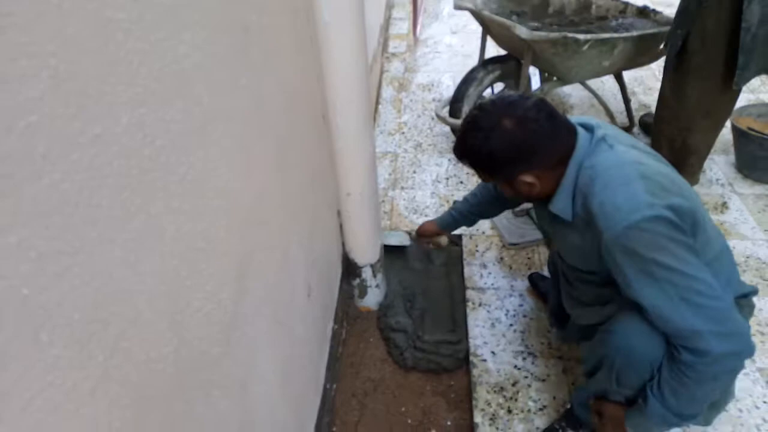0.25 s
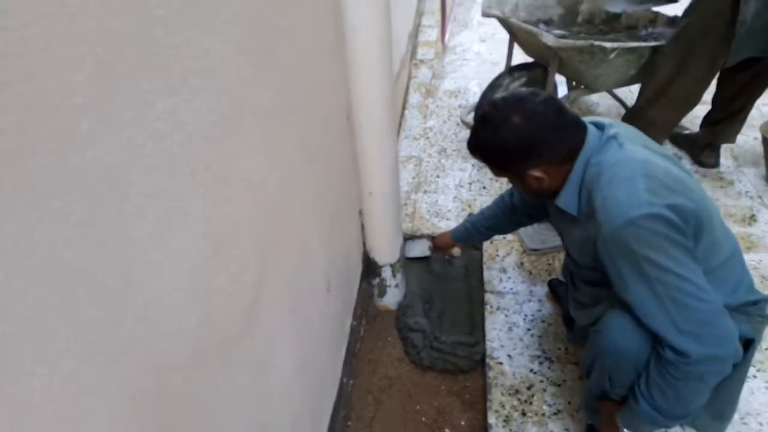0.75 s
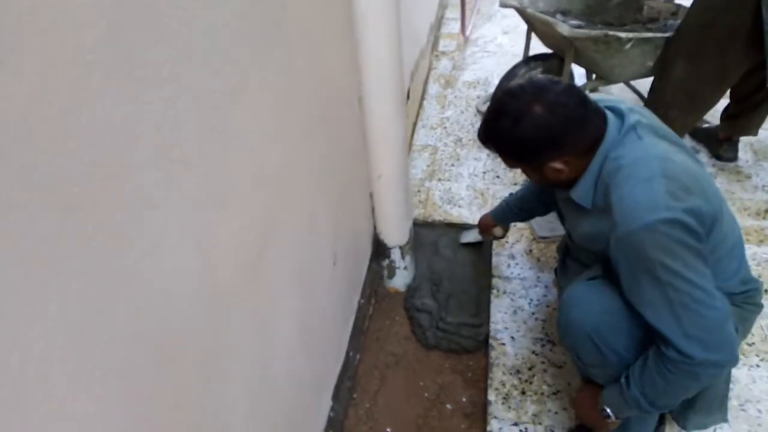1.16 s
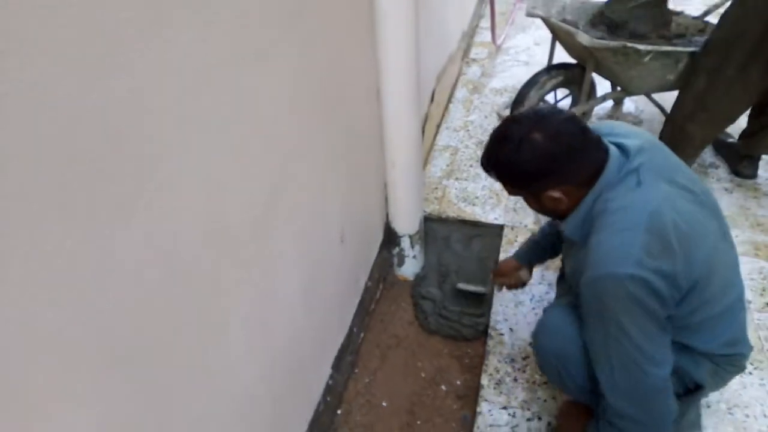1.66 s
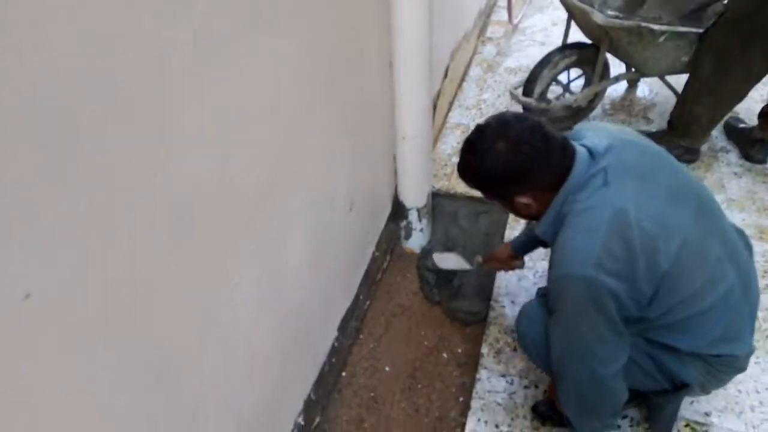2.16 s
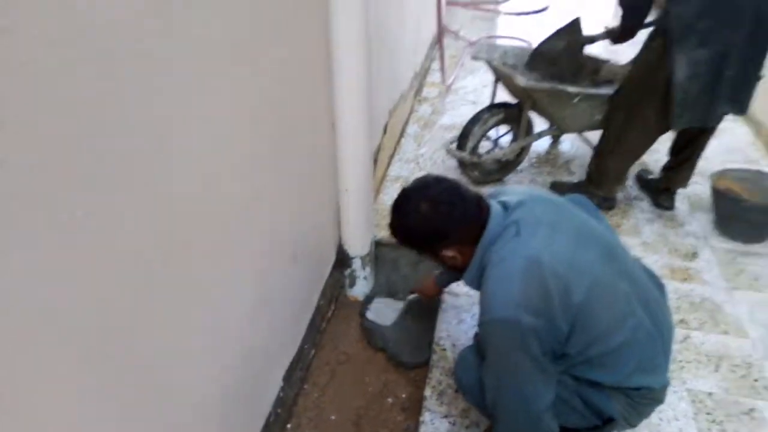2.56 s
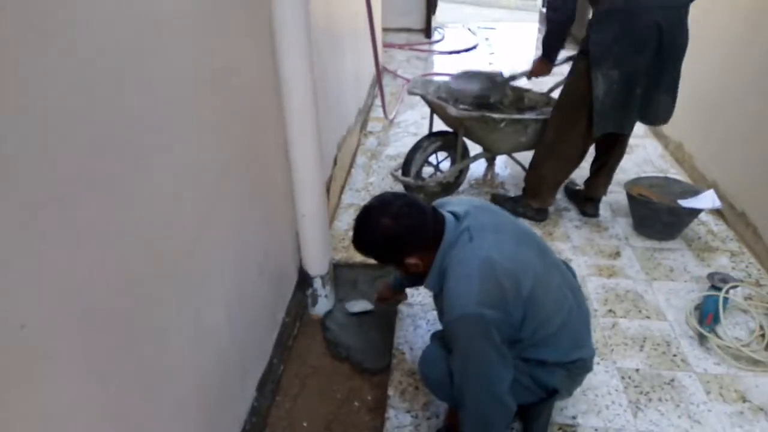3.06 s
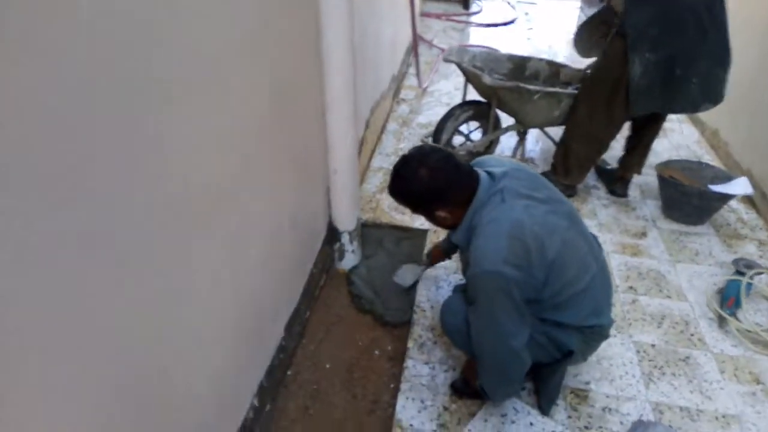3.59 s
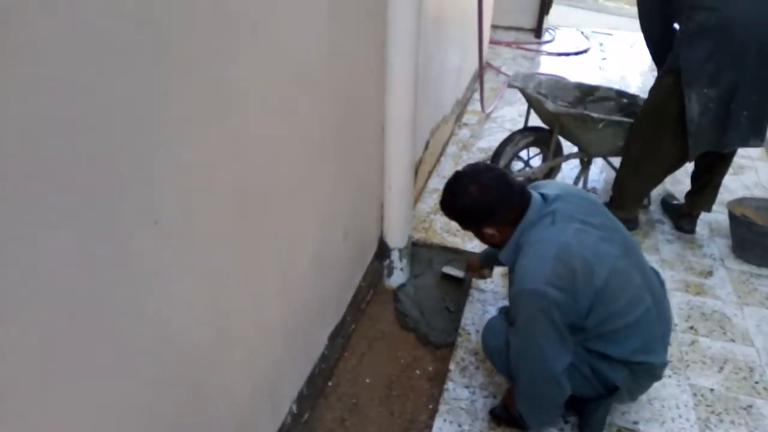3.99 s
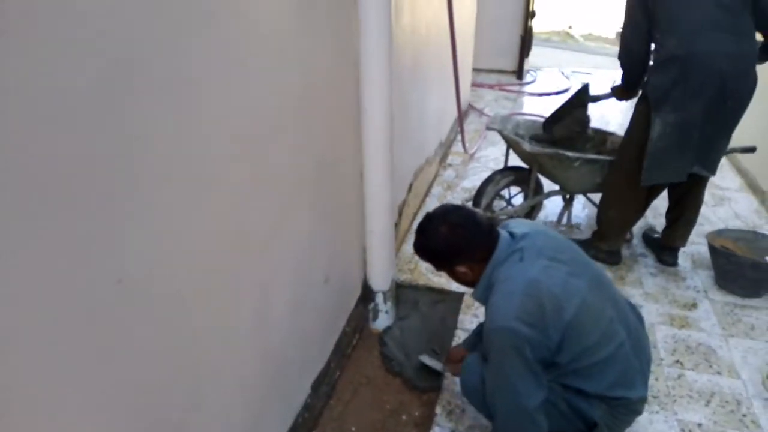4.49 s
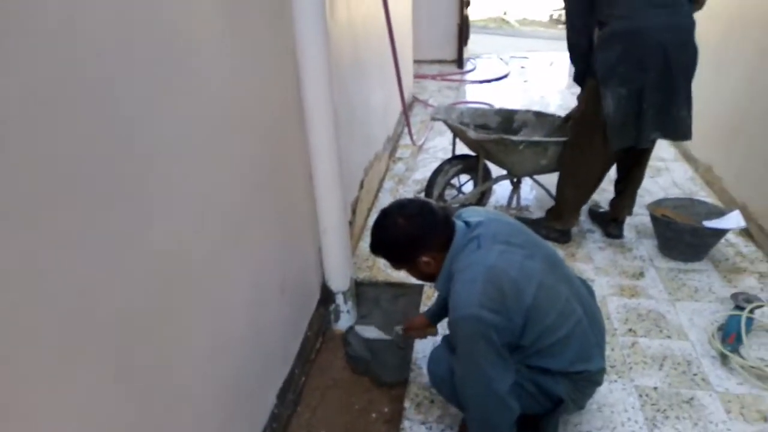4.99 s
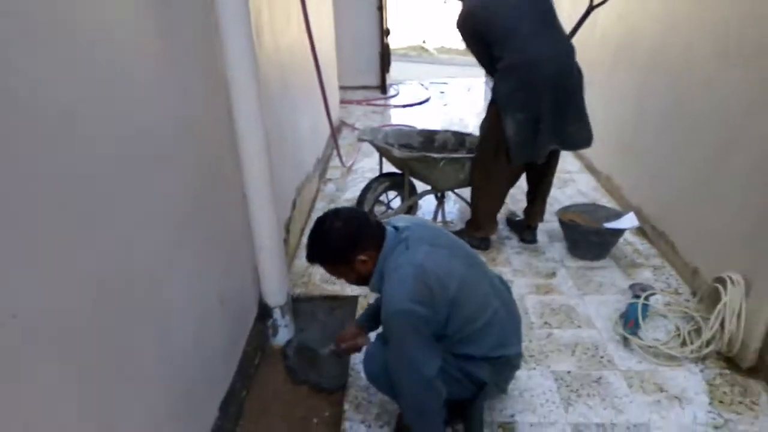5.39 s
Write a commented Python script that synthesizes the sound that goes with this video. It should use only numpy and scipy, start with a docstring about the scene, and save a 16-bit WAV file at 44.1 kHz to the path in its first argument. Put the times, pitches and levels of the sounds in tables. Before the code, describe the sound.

In a paved passage between two walls, a trowel spreads wet mortar with gritty hisses, crunches and soft popping slaps. Early on a shovel judders and squeals along a steel wheelbarrow with a hollow boom; later it digs into the sandy mix. Sharp clicks and faint blade rings fall between. Quiet outdoor air, short echoes, a small microphone with dulled treble.

```python
"""Sand hisses and crunches under a steel trowel that spreads and slaps wet mortar in a paved passage.
Strokes are streams of grain clicks; slaps add a splat, an air-pocket pop and a soft thud of noise.
A shovel judders along a steel wheelbarrow: a wavering tone squeals, resonances rasp and boom.
Later it digs into the sandy mix. Small bumps, clicks and blade rings fall between, over quiet outdoor
air; two walls add echoes and a short tail, and a small microphone dulls the treble."""
import sys
import numpy as np
from scipy import signal
from scipy.fft import rfft, irfft
from scipy.io import wavfile
from scipy.ndimage import uniform_filter1d

SR = 44100
rng = np.random.default_rng(int(sys.argv[2]) if len(sys.argv) > 2 else 0)


def int16_out(signal):
    """Quantize to a 16-bit WAV file."""
    q = np.round(np.clip(np.atleast_2d(signal).T, -1, 1) * 32767)
    wavfile.write(sys.argv[1], SR, q.astype(np.int16))


N = 248724
TIME = np.arange(N) / SR
HZ = np.fft.rfftfreq(N, 1 / SR)
# All table levels are relative: layer gains, echoes and the microphone follow.


def amp(db):
    """Decibels to gain."""
    return 10 ** (np.asarray(db) / 20)


def unit(x):
    """Scales to rms 1."""
    return x / np.sqrt(np.mean(x ** 2) + 1e-20)


def steady(x, length_s):
    """Evens the level to rms 1 over stretches of the given length."""
    power = uniform_filter1d(x ** 2, max(int(length_s * SR), 3))
    return x / np.sqrt(abs(power) + 1e-12)


def read(points, hz):
    """Reads a table on a log-frequency axis."""
    f, value = np.transpose(points)
    return np.interp(np.log(hz + 1), np.log(f + 1), value)


def colour(x, points):
    """Causal minimum-phase filter with the given spectrum."""
    log_gain = np.log(amp(read(points, abs(np.fft.fftfreq(N, 1 / SR)))))
    # the Hilbert transform of the log gain gives the phase
    response = np.exp(np.conj(signal.hilbert(log_gain)))
    taps = irfft(response[:len(HZ)], N)[:4096]
    return signal.oaconvolve(x, taps)[:N]


def ring(x, modes):
    """Passes x through parallel resonances of alternating sign."""
    body = 0
    for k, (f, width, db) in enumerate(modes):
        detuning = (HZ ** 2 - f ** 2) / (width * HZ + 1e-9)
        body = body + (-1) ** k * amp(db) / (1 + 1j * detuning)
    return irfft(rfft(x) * body, N)


def wander(hz):
    """Random drift of rms 1, up to about the given rate."""
    return unit(irfft(rfft(rng.standard_normal(N)) / (1 + (HZ / hz) ** 4), N))


def scrape(x, modes, flare_db, flare_hz):
    """The point of contact moves, so each mode flares and fades on its own."""
    out = np.zeros(N)
    for k, mode in enumerate(modes):
        out += (-1) ** k * ring(x, [mode]) * amp(flare_db * wander(flare_hz))
    return out


def level(s, db):
    """Gain along a curve, fading within milliseconds outside it."""
    outside_s = np.maximum(np.maximum(s[0] - TIME, TIME - s[-1]), 0)
    return amp(np.interp(TIME, s, db)) * np.exp(-(outside_s / 0.0081) ** 2)


def swell(start, rise, fall, swell_db, fade_db):
    """One push of a tool: friction grows as it bears down and fades as it eases off."""
    return level([start, start + rise, start + rise + fall], [-swell_db, 0, -fade_db])


def add(mix, s, sound):
    """Mixes a sound in at time s."""
    part = mix[round(s * SR):][:len(sound)]
    part += sound[:len(part)]


def grains(per_s, spread_db, clump_db):
    """Clicks of sand grains of uneven size that break loose in clumps."""
    size = amp(spread_db * np.minimum(rng.exponential(1, N), 5))
    sign = rng.choice([-1, 1], N)
    hits = rng.random(N) < per_s / SR
    return unit(size * sign * hits * amp(clump_db * wander(63)))


def burst(t, rise_s, decay_s):
    """Envelope of a blow."""
    return (1 - np.exp(-t / rise_s)) * np.exp(-t / decay_s)


def band_noise(t, hz, ratio):
    """A short stretch of noise around hz, with a fairly even level."""
    edges_hz = [hz / (1 + ratio), min(hz * (1 + ratio), SR / 2.2)]
    sos = signal.butter(3, edges_hz, "band", fs=SR, output="sos")
    # the first half lets the filter settle
    x = signal.sosfilt(sos, rng.standard_normal(2 * len(t)))
    return steady(x, 3 / hz)[-len(t):]


def knocks(rows, rise_s, ratio):
    """Damped contacts: each a decaying noise band of its own pitch."""
    t, out = TIME[:SR // 3], np.zeros(N)
    for s, db, hz, decay_s in rows:
        add(out, s, amp(db + 2.0) * burst(t, rise_s, decay_s) * band_noise(t, hz, ratio))
    return out


def outdoor_air():
    """Steady noise shaped to the outdoor background."""
    # Background spectrum. Each row: frequency in Hz, level in dB.
    air_spectrum = [(25, -17), (60, -6.5), (105, 11.5), (170, -0.5), (300, -2.5), (480, -11), (900, -7.5),
                    (1800, -0.5), (3600, -10), (6200, -1.5), (9000, -28), (16000, -35)]
    return amp(-62.5) * unit(colour(rng.standard_normal(N), air_spectrum))


def dull_bumps():
    """The barrow, shifting feet and falling mortar bump with slow onsets."""
    # Each row: start in seconds, level in dB, pitch in Hz, decay in seconds.
    bump_rows = [(.332, -39, 187, 0.024), (.431, -22.5, 714, .008), (.431, -27.5, 175, 0.017),
                 (.532, -25, 174, 0.012), (2.514, -44, 404, 0.012), (2.607, -46, 248, 0.023),
                 (2.615, -47.5, 98, .023), (3.667, -46, 446, 0.02), (3.675, -46, 134, 0.045),
                 (3.96, -37, 224, 0.014), (4.54, -61, 134, 0.17), (4.98, -53, 313, 0.05)]
    return knocks(bump_rows, rise_s=0.005, ratio=0.37)


def barrow():
    """Steel sticks and slips on steel: the shovel squeals, the tray rasps and booms."""
    # Pushes along the tray. Each row: start, bearing down and easing off in seconds,
    # squeal and boom levels in dB.
    pushes = [(.295, .025, .01, -52.5, -66), (0.333, 0.089, 0.16, -38, -36.5),
              (.735, 0.038, 0.026, -65.5, -51.5), (1.005, .035, 0.12, -37, -43.5),
              (1.4, 0.08, 0.123, -47.5, -43.5)]
    # Catches and slips. Each row: time in seconds, squeal and rasp levels in dB, length in seconds.
    slips = [(0.291, -47, -54, 0.0016), (0.327, -30.5, -66, 0.0015), (0.361, -37.5, -38.5, 0.0059),
             (0.405, -27.5, -34.5, 0.0043), (0.435, -24, -25.5, 0.0026), (0.439, -30, -35, 0.0032),
             (0.468, -20, -27, 0.0055), (0.517, -42, -33.5, 0.012), (0.535, -24, -34, 0.0045),
             (0.551, -44, -36, 0.017), (1.032, -25, -47, 0.0058), (1.061, -41, -25.5, 0.0033),
             (1.082, -25, -29.5, 0.0053), (1.449, -41, -39.5, 0.0037), (1.506, -38, -36.5, 0.0063),
             (1.633, -38, -55, 0.0036)]
    # Shovel and tray resonances. Each row: frequency in Hz, width in Hz, level in dB.
    steel_modes = [(283, 22, 3), (396, 98, 1), (839, 58, 3.5), (1306, 29, 5), (1548, 33, 5),
                   (2270, 210, 1.5), (3640, 26, 6), (3720, 33, 6.5), (4046, 45, 7.5), (4280, 59, 3.5),
                   (4784, 47, 5), (5470, 270, -10.5), (6205, 64, 2.5), (6690, 200, -4.5)]
    # Hollow of the barrow. Each row: frequency in Hz, width in Hz, level in dB.
    tray_modes = [(95.5, 1.8, 8.5), (155.2, 46, -11), (199, 42, -12)]
    # Grit crushed under the shovel. Each row: frequency in Hz, level in dB.
    rasp_spectrum = [(25, -58), (130, 16), (260, 1), (500, -11.5), (850, -2), (1100, -20), (1400, -9),
                     (3000, -9.5), (7000, -9), (16000, -18)]
    squeal_hz, squeal_wander_hz = 2245, 75
    judder_db, judder_hz = 2, 109
    boom_linger_s = 0.082

    drag, boom = np.zeros((2, N))
    for start, rise, fall, squeal_db, boom_db in pushes:
        drag += amp(squeal_db) * swell(start, rise, fall, swell_db=4.5, fade_db=20)
        boom += amp(boom_db) * swell(start, rise, fall + boom_linger_s, swell_db=7.5, fade_db=10.5)
    squeal = amp(3.0) * drag * amp(1.1 * wander(120))
    rasp = amp(5.5) * drag
    for s, squeal_db, rasp_db, length_s in slips:
        slip = np.exp(-((TIME - s) / length_s) ** 2 / 2)
        squeal += amp(squeal_db) * slip
        rasp += amp(rasp_db) * slip

    pitch_hz = squeal_hz + squeal_wander_hz * wander(382)
    tone = unit(np.sin(2 * np.pi * np.cumsum(pitch_hz) / SR))
    contacts = grains(per_s=4000, spread_db=5.0, clump_db=3.0)
    steel = unit(scrape(contacts, steel_modes, flare_db=1.0, flare_hz=24.4))
    grit = unit(colour(grains(per_s=3700, spread_db=2.0, clump_db=2.2), rasp_spectrum))
    # steel and grit pulse together; 1.07 dB offsets part of the judder's gain
    judder = amp(judder_db * wander(judder_hz) - 1.07)
    chatter = steady(steel + amp(-4.5) * grit, 0.019) * judder
    tray = ring(rng.standard_normal(N), tray_modes)
    hollow = steady(ring(tray, [(133, 155, 0)]), 0.06)
    return squeal * tone + rasp * chatter + boom * hollow


def shovel():
    """Sand and small stones run over the shovel's edge; the blade flexes as it takes the load."""
    # The dig: start, pushing in and drawing out, all in seconds.
    dig = (4.102, 0.21, 0.23)
    # Stones meeting the shovel. Each row: time in seconds, level in dB.
    stones = [(4.218, -37), (4.258, -34), (4.306, -27), (4.347, -38.5), (4.419, -44), (4.448, -35)]
    # Shovel edge. Each row: frequency in Hz, width in Hz, level in dB.
    edge_modes = [(2650, 110, 5.5), (2954, 110, 3.5), (3340, 250, -3.5), (5070, 980, -4), (6300, 300, 1.5),
                  (6670, 350, 2.5), (9600, 6100, -6), (15400, 2000, -8.5)]
    # Bending of the loaded shovel. Each row: frequency in Hz, width in Hz, level in dB.
    flex_modes = [(374, 166, -13), (1020, 79, -3), (1480, 280, -11), (1820, 190, -6.5), (2250, 43, -4.5)]
    edge_db, flex_db, load_peak_s = -42, -43.5, 0.35

    start, rise, fall = dig
    force = amp(edge_db) * swell(start, rise, fall, swell_db=3, fade_db=2.5)
    # the load peaks later than the push
    load_fall_s = max(rise + fall - load_peak_s, 0)
    load = amp(flex_db) * swell(start, load_peak_s, load_fall_s, swell_db=8, fade_db=15.5)
    for s, db in stones:
        add(force, s, amp(db) * burst(TIME[:SR // 8], 0.00033, 0.0058))
    sand = grains(per_s=2300, spread_db=2.5, clump_db=1.0)
    edge = steady(scrape(sand, edge_modes, flare_db=2.5, flare_hz=35), 0.043)
    flex = steady(scrape(sand, flex_modes, flare_db=2.2, flare_hz=21.6), 0.033)
    return force * edge + load * flex


def grit_ticks():
    """Steel clicks on grit: sharp onsets, wide noise bands."""
    # Each row: start in seconds, level in dB, pitch in Hz, decay in seconds.
    tick_rows = [(.053, -33.5, 4170, .005), (.073, -29.5, 2600, 0.0012), (.211, -32, 3180, 0.0025),
                 (.670, -38, 2880, 0.0092), (.731, -31, 9900, 0.0024), (.835, -36.5, 5400, 0.01),
                 (.972, -20, 5560, 0.002), (1.121, -15.5, 3000, 0.0017), (1.260, -11.5, 9900, 0.0025),
                 (1.441, -31.5, 4000, .004), (1.487, -28.5, 4070, .0033), (1.663, -25.5, 4240, 0.0022),
                 (1.919, -39.5, 4200, 0.0019), (2.032, -41, 6000, 0.0024), (2.134, -34, 6550, 0.0026),
                 (2.144, -20.5, 2920, 0.0074), (2.605, -23, 10900, .0016), (3.119, -32.5, 5100, 0.011),
                 (3.527, -39, 4040, 0.0068), (3.668, -52.5, 2150, 0.033), (4.834, -28.5, 2950, 0.0037),
                 (4.861, -26, 11000, 0.0096), (5.556, -40, 2900, 0.011), (5.581, -27, 7000, 0.0018)]
    return knocks(tick_rows, rise_s=0.00062, ratio=0.9)


def clinks():
    """Lifted clear of the paste, the bare blade rings briefly when struck lightly."""
    # Each row: start in seconds, level in dB.
    strikes = [(.837, -32.5), (1.262, -31), (2.853, -37.5), (4.835, -47.5)]
    # Bare blade. Each row: frequency in Hz, level in dB, decay in seconds.
    bare_modes = [(938, -9.5, 0.0068), (2420, -1, 0.0091), (5130, -6, 0.0061), (6360, -1.5, 0.0079)]
    rings = []
    for s, db in strikes:
        for hz, mode_db, decay_s in bare_modes:
            rings.append((s, db + mode_db, hz, decay_s))
    return knocks(rings, rise_s=0.00087, ratio=0.02)


def slaps():
    """Wet paste spatters, a pocket of air pops, and the mass settles with a slower thud."""
    # Blade landing on mortar. Each row: start in seconds, splat level in dB, splat decay in seconds,
    # air pocket in Hz, pocket level in dB, thud in Hz, thud level in dB.
    landings = [(0.07, -35.5, 0.041, 1260, -26, 352, -41), (1.031, -30, 0.09, 1530, -28, 167, -41),
                (1.108, -30, 0.0095, 1720, -34, 383, -35.5), (1.262, -22, 0.028, 1340, -21, 146, -28.5),
                (2.143, -45.5, 0.15, 844, -22.5, 342, -40), (2.165, -36, 0.071, 790, -23.5, 287, -36),
                (2.221, -35.5, 0.02, 966, -25.5, 280, -44), (2.851, -44, 0.029, 940, -35.5, 250, -43),
                (3.118, -49, 0.098, 1500, -46, 294, -49.5), (3.821, -35, 0.089, 1190, -16, 278, -42),
                (3.901, -38, 0.068, 1300, -32, 260, -35), (4.862, -31.5, 0.024, 1026, -30, 240, -39),
                (5.251, -51, 0.04, 1800, -38.5, 350, -65), (5.616, -31, 0.048, 695, -22.5, 257, -27)]
    # Spatter of the paste. Each row: frequency in Hz, level in dB.
    splat_spectrum = [(25, -61), (90, -1), (220, -19.5), (480, 4.5), (750, 3.5), (1300, 0.5), (2000, -1),
                      (3000, -2.5), (6000, -3.5), (16000, -26.5)]
    t = TIME[:SR // 2]
    splat, pops = np.zeros((2, N))
    for s, db, decay_s, pocket_hz, pocket_db, thud_hz, thud_db in landings:
        pocket = burst(t, 0.0015, 0.01) * band_noise(t, pocket_hz, ratio=0.18)
        thud = burst(t, 0.011, 0.032) * band_noise(t, thud_hz, ratio=0.53)
        add(splat, s, amp(db) * burst(t, 0.00071, decay_s))
        add(pops, s, amp(pocket_db - 3.0) * pocket)
        add(pops, s, amp(thud_db + 4.5) * thud)
    spatter = colour(grains(per_s=5000, spread_db=0.0, clump_db=-1.3), splat_spectrum)
    return pops + splat * steady(spatter, 0.041)


def trowel():
    """Sand slides under the blade: fine grains hiss, coarse ones crunch as it presses, odd pebbles tick."""
    # Each row: start, pressing in and easing off in seconds, hiss level in dB,
    # crunch offset from that level in dB.
    strokes = [(0.0, 0.055, 0.036, -43.5, 1.5), (0.111, 0.064, 0.068, -48, 6), (.675, .02, 0.42, -59.5, -5),
               (0.864, .105, 0.22, -40.5, 4.5), (1.032, 0.016, 0.31, -36, 3.5),
               (1.263, 0.0072, 0.074, -41.5, 10), (1.37, 0.13, 0.05, -42.5, 3), (1.54, 0.11, 0.28, -45, -3),
               (1.88, 0.07, 0.24, -63, 0), (2.147, 0.013, 0.19, -38, 7), (2.37, .13, 0.24, -50.5, -3),
               (2.671, 0.058, 0.12, -46.5, -2), (2.84, 0.019, 0.085, -51.5, 5),
               (2.95, 0.058, 0.41, -53.5, -0.5), (3.115, 0.011, 0.24, -41.5, -4.5),
               (3.23, 0.16, 0.21, -51.5, -7.5), (3.524, 0.056, 0.16, -54, -8),
               (3.781, 0.053, 0.17, -40.5, 4.5), (4.489, 0.012, 0.14, -46, -3.5),
               (4.66, 0.076, 0.065, -64, 0.5), (4.864, 0.01, .15, -41.5, -1.5),
               (4.99, 0.18, 0.31, -55.5, -0.5), (5.566, 0.057, .1, -42, 5)]
    # Fine sand. Each row: frequency in Hz, level in dB.
    hiss_spectrum = [(700, -59.5), (1500, 2), (2400, 2), (3500, -1.5), (4500, 3), (6300, 4), (9000, 0.5),
                     (16000, -3)]
    # Coarse sand. Each row: frequency in Hz, level in dB.
    crunch_spectrum = [(25, -36), (150, -7.5), (330, -2.5), (550, -11), (850, 0.5), (1300, -1.5),
                       (2000, 0.5), (2800, -5), (5000, -14.5), (16000, -44)]
    # Blade damped by mortar. Each row: frequency in Hz, width in Hz, level in dB.
    damped_modes = [(933, 18, -5), (1337, 160, -3.5), (1876, 220, -2.5), (2220, 260, -3), (3460, 620, -0.5),
                    (5100, 330, 7), (5760, 1000, 2.5)]
    pebbles_per_s, pebble_db = 70, -10.5  # level relative to the hiss

    slide, press = np.zeros((2, N))
    for start, rise, fall, hiss_db, press_db in strokes:
        slide += amp(hiss_db) * swell(start, rise, fall, swell_db=9.5, fade_db=19.5)
        press += amp(hiss_db + press_db) * swell(start, rise, fall, swell_db=13.5, fade_db=17.5)

    fine = grains(per_s=12000, spread_db=2, clump_db=2.5)
    coarse = grains(per_s=2700, spread_db=3.5, clump_db=3.0)
    # further grains of each kind sound through the blade's resonances
    fine_ring = unit(ring(grains(per_s=6000, spread_db=4.5, clump_db=3.2), damped_modes))
    blade_hits = grains(per_s=2200, spread_db=1.5, clump_db=-0.1)
    coarse_ring = unit(scrape(blade_hits, damped_modes, flare_db=2.5, flare_hz=23))

    hiss = steady(colour(fine + amp(-11.5) * fine_ring, hiss_spectrum), 0.018)
    crunch = steady(colour(coarse + amp(-0.5) * coarse_ring, crunch_spectrum), 0.02)
    large = grains(per_s=pebbles_per_s, spread_db=4.0, clump_db=1.0)
    pebbles = amp(pebble_db) * unit(colour(large, hiss_spectrum))
    return amp(6.5) * slide * (hiss + pebbles) + amp(-0.54) * press * crunch


def passage(x):
    """Early echoes from ground and walls, and a short diffuse tail of sparse decaying reflections."""
    # Decay between the walls. Each row: frequency in Hz, time to fall 60 dB in seconds.
    wall_t60 = [(100, 0.76), (400, 0.91), (1500, 0.53), (6000, 0.39), (15000, 0.33)]
    signs = rng.choice([-1., 1.], SR)
    taps = signs * (rng.random(SR) < 3000 / SR) * (TIME[:SR] > .012)
    hz, t, z = signal.stft(taps, SR, nperseg=256)
    decay = amp(-60 * t / read(wall_t60, hz)[:, None])
    tail = signal.istft(z * decay, SR, nperseg=256)[1]
    echo = amp(-13) * tail / np.linalg.norm(tail)
    # (delay in seconds, dB relative to the direct sound)
    for s, db in [(.0034, -31), (.0048, -22.5), (.0074, -20.5), (.0135, -20.5), (.0225, -46)]:
        echo[round(s * SR)] += amp(db)
    return x + signal.fftconvolve(x, echo)[:N]


def scene():
    """Trowel and shovel work in the passage, over quiet outdoor air."""
    work = dull_bumps() + barrow() + shovel()
    work += grit_ticks() + clinks() + slaps() + trowel()
    return (amp(-1.5) * passage(outdoor_air() + work))[None]


def record(dry):
    """A small microphone, dull above 7 kHz with a port resonance at the top; then the band limit."""
    # Microphone response. Each row: frequency in Hz, level in dB.
    mic_response = [(20, -14), (60, 0.5), (330, -2), (540, -2.5), (720, 0.5), (6700, -2.5), (7500, -10),
                    (8600, -16), (10500, -14), (12500, -20), (13900, -14.5), (15000, -4), (15800, -6),
                    (16300, -35)]
    edge_hz = 16100
    heard = colour(dry[0], mic_response)
    lowpass = signal.firwin(511, edge_hz, window=("kaiser", 9), fs=SR)
    return signal.oaconvolve(heard, lowpass, "same")[None]


dry = scene()
out = record(dry)
int16_out(out)
```